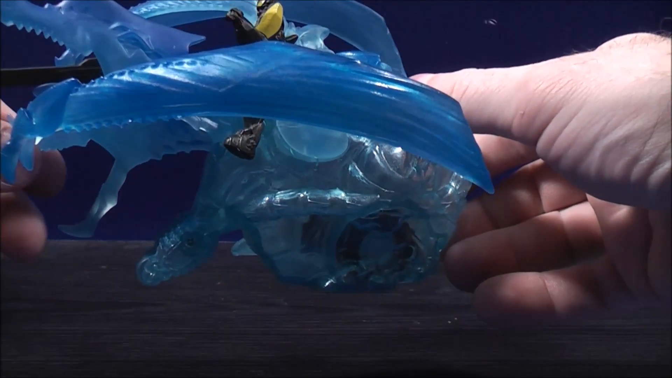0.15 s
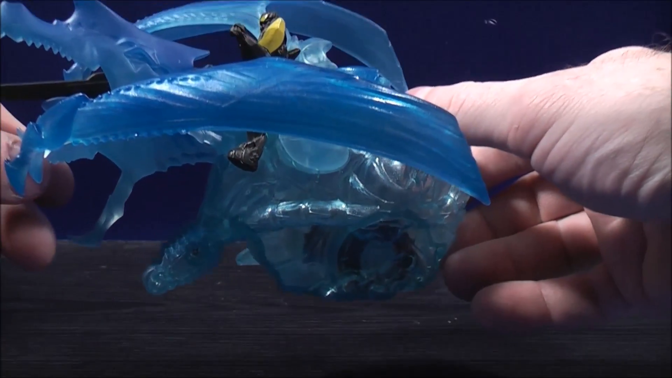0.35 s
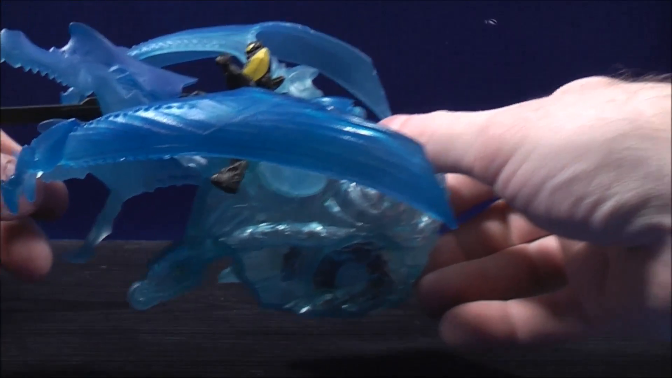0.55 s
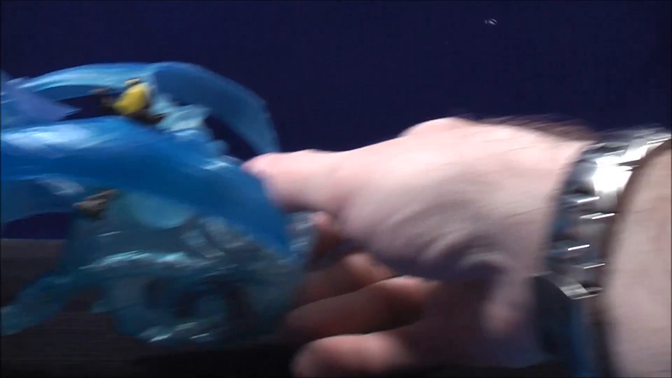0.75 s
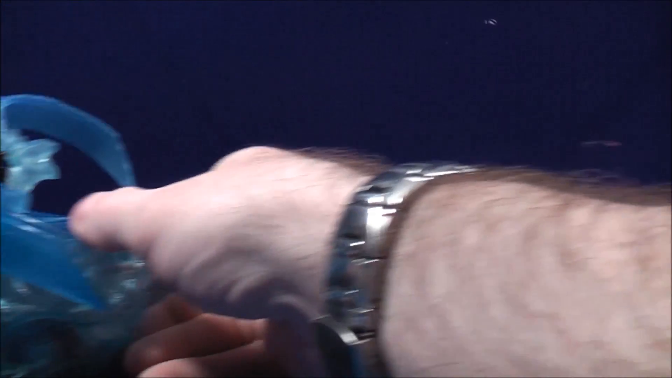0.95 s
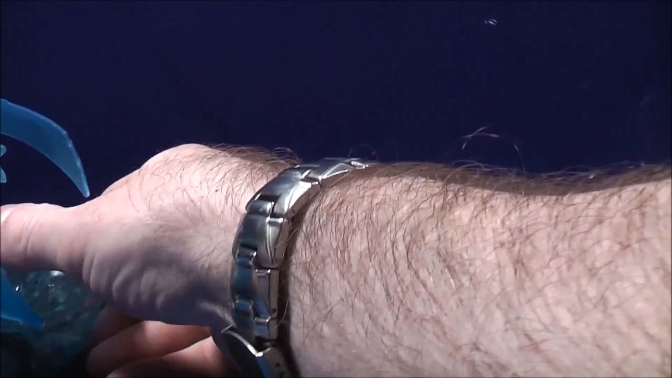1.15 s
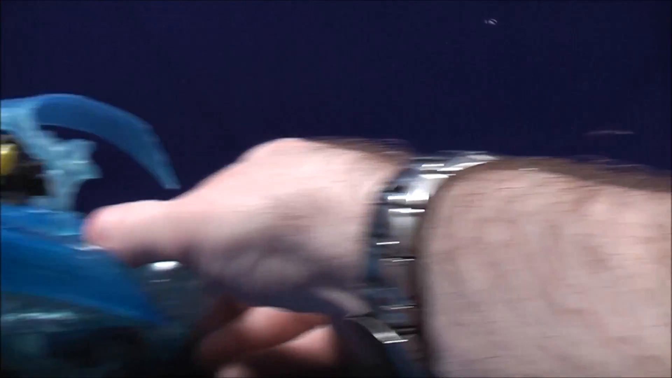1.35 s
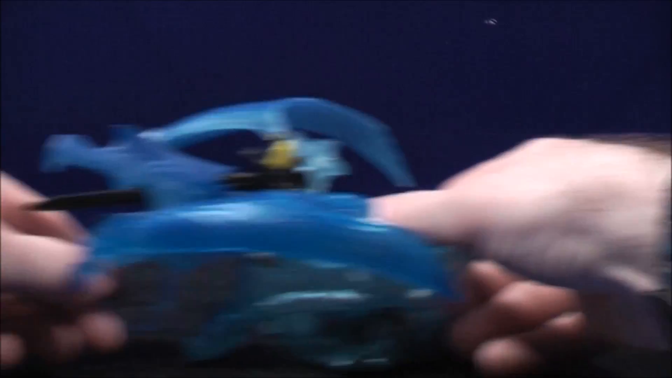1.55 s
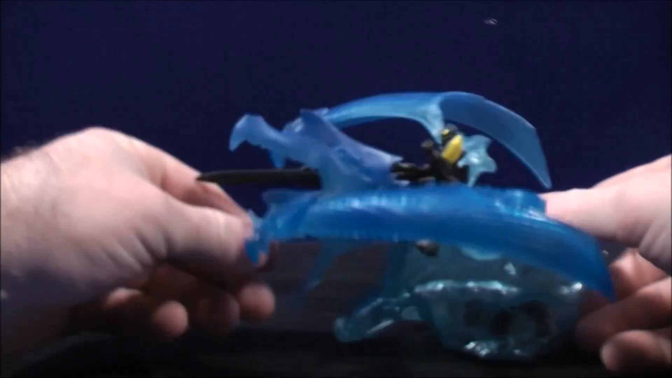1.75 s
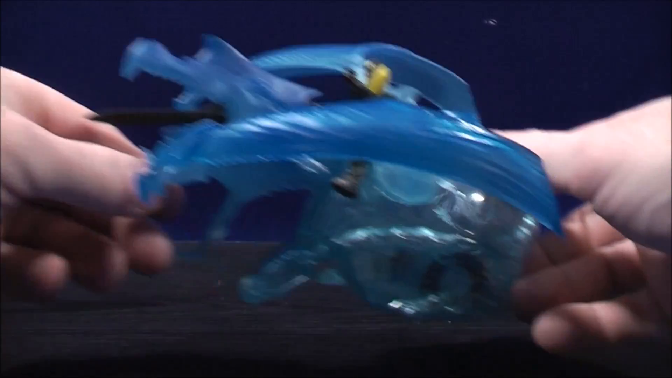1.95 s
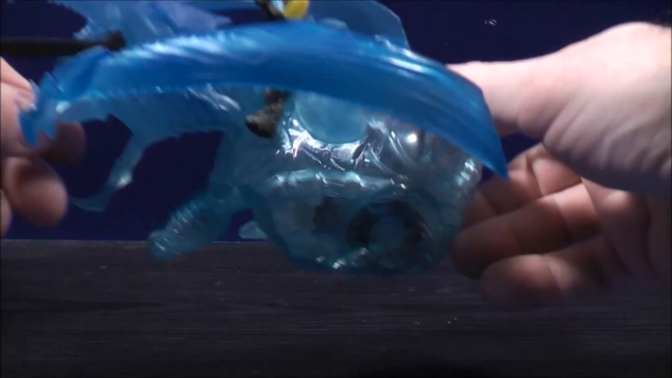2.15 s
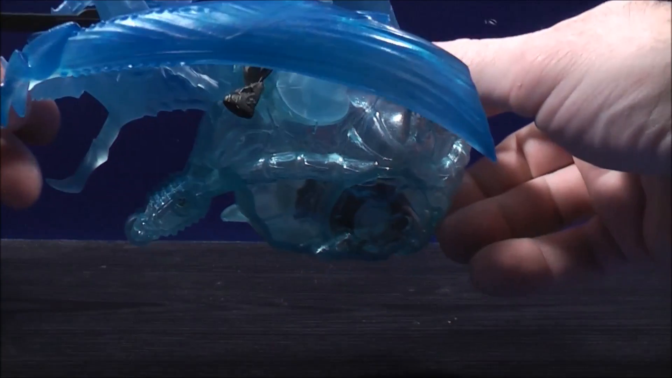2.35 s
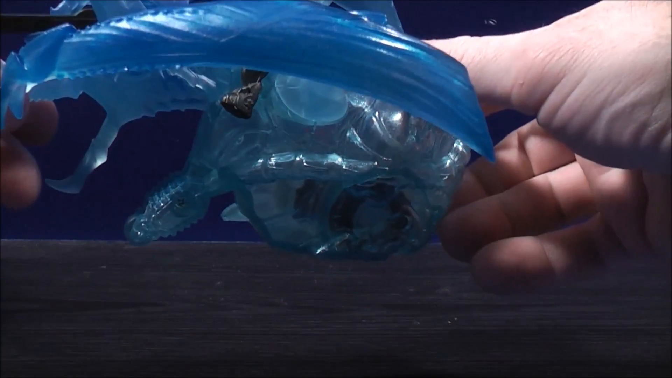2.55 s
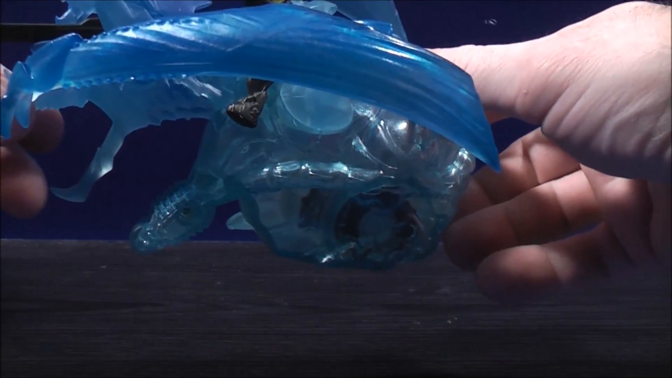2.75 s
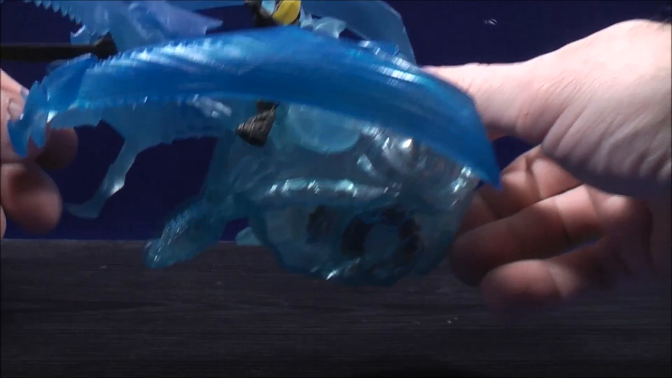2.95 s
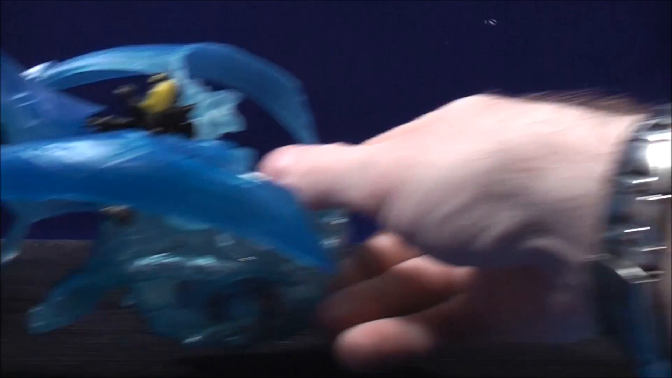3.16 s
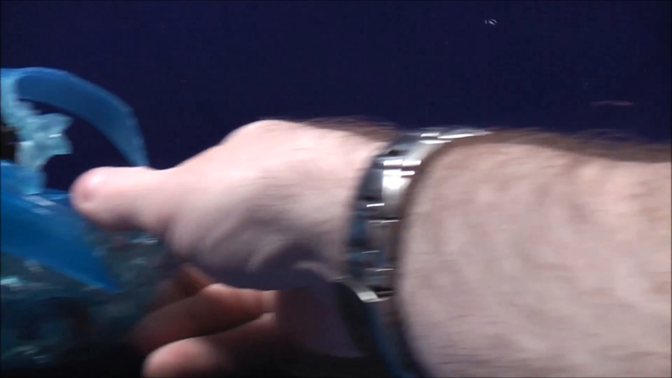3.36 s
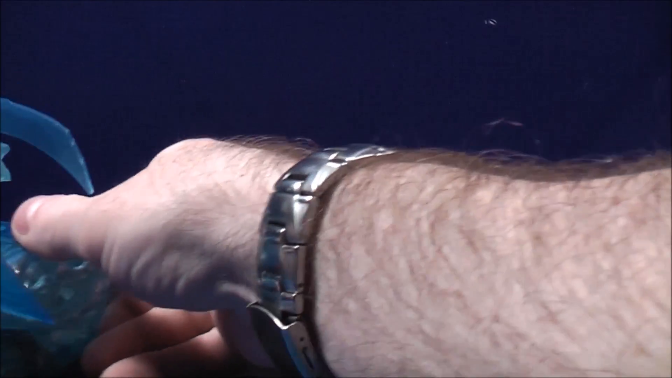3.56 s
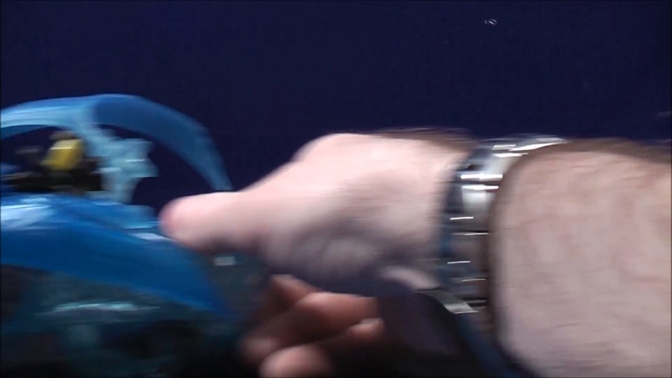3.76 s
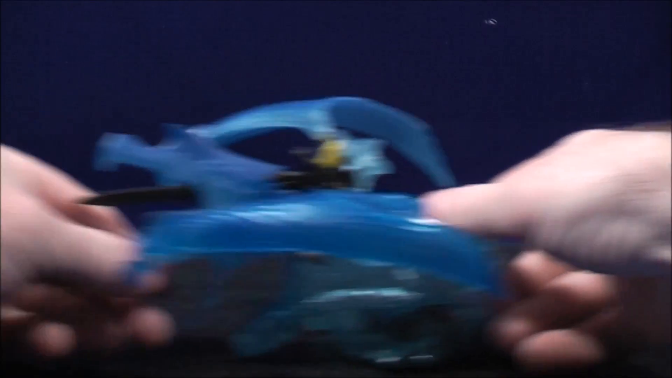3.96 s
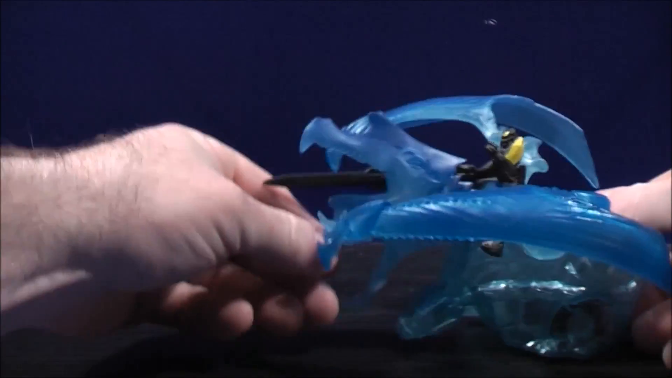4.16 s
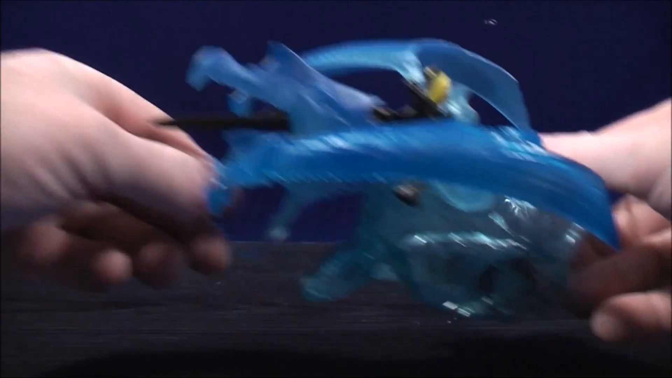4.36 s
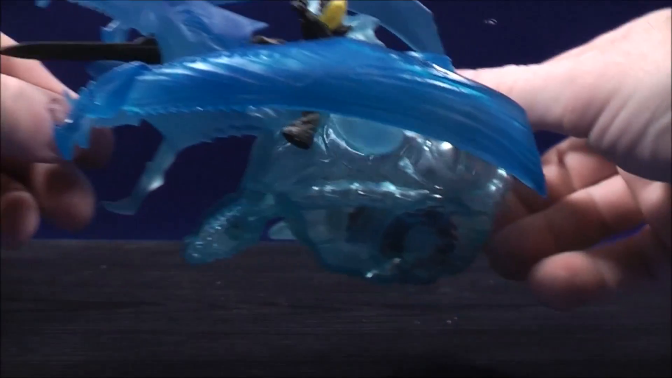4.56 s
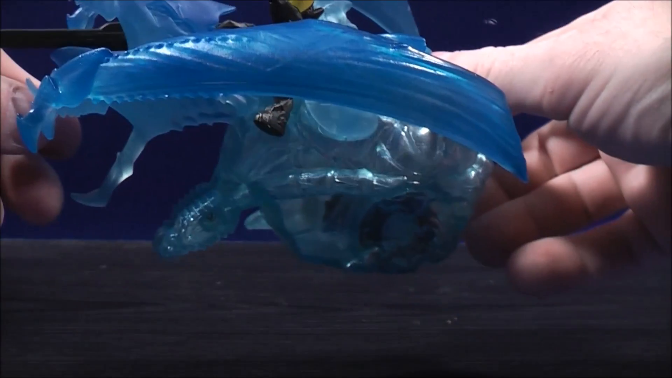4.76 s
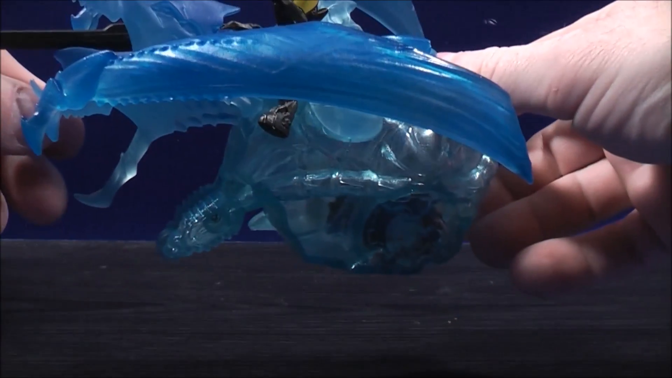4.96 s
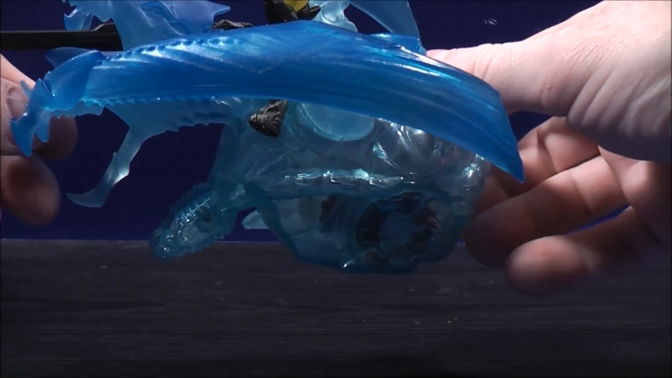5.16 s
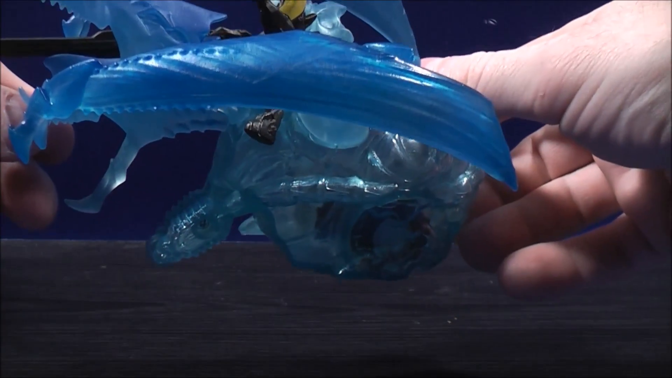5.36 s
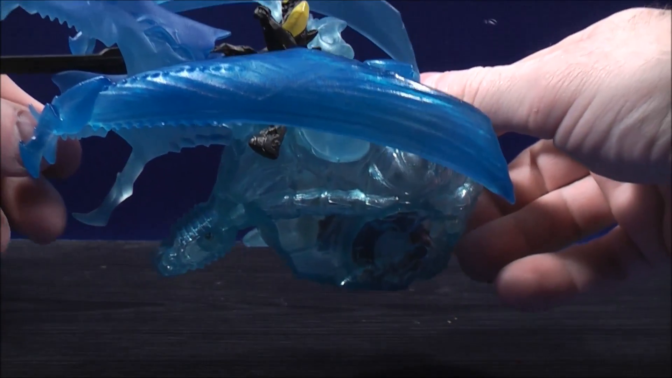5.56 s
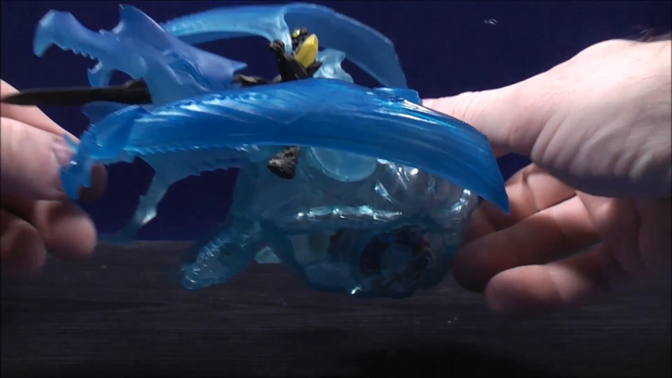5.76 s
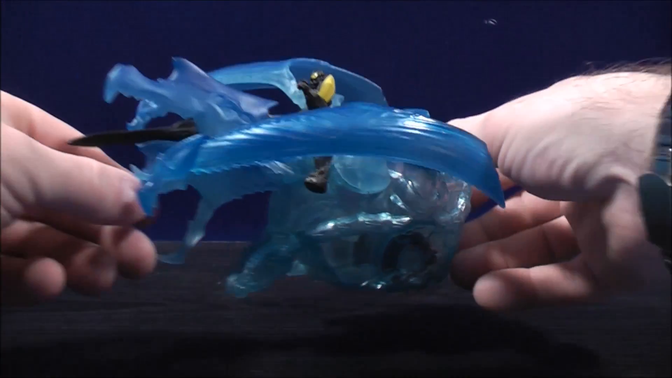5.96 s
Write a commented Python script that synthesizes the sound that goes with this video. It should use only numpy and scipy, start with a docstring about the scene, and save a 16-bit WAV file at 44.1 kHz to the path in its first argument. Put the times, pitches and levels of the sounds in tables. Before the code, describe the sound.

Close up in a quiet room, small gears spin down inside a plastic toy. After a short pause the toy taps onto a wooden table and is pulled back with a rising grind and low rumble. Released, the motor zips and whirs, loose gears clicking in the shell as they slow and stop. A second pull and release follows, sputtering out in a few last ticks.

```python
"""Pull-back toy on a wooden table

A plastic toy is set down, dragged so that its wheels wind the gears, and lifted, twice over. The gear
train whirs, rattles loosely in its shell and runs down, with a zip of meshing teeth at each lift;
the wheels rumble through the table top. The scene opens on a run already dying away.
A quiet room hums around a close stereo microphone."""
import sys
import numpy as np
from scipy import signal
from scipy.fft import rfft, irfft, next_fast_len
from scipy.io import wavfile
from scipy.ndimage import uniform_filter1d, map_coordinates

SR = 44100
rng = np.random.default_rng(int(sys.argv[2]) if len(sys.argv) > 2 else 0)


def put_to_file(sound):
    """Save the sound as 16-bit audio at rate SR, in the file named by the first command-line argument."""
    columns = np.atleast_2d(sound).T  # one column per channel
    safe = np.clip(columns, -1, 1)
    whole_steps = np.round(safe * 32767)
    wavfile.write(sys.argv[1], SR, whole_steps.astype(np.int16))


N = 264419
T = np.arange(N) / SR


def gears():
    """Tooth noise, a purr of ticks and loud clacks shake the shell; the tone follows load and speed."""
    # whirr level, one curve per run or drag: time_s, level_db
    whirr_curves = [
        [(0.0, -36.5), (0.292, -42.5), (0.572, -52), (0.66, -92.5)],
        [(1.24, -66.5), (1.31, -46.5), (1.484, -39), (1.65, -37), (1.76, -38.5), (1.83, -53)],
        [(1.831, -40.5), (1.9, -27), (1.96, -28), (2.055, -34), (2.727, -38), (3.02, -44.5), (3.1, -54),
         (3.15, -47), (3.289, -55.5), (3.325, -62), (3.37, -81)],
        [(3.612, -54), (3.66, -48), (3.838, -38), (4.18, -34), (4.26, -52)],
        [(4.261, -48), (4.298, -38.5), (4.308, -28.5), (4.519, -33.5), (5.07, -39), (5.1, -40.5), (5.2, -40.5),
         (5.42, -48.5), (5.46, -46), (5.51, -57.5), (5.55, -47.5), (5.58, -59), (5.605, -45.5), (5.66, -66),
         (5.72, -74)],
    ]
    # loudest clacks of the loose gears: start_s, body_db, treble_over_body_db
    clacks = [(0.0147, -4.5, 4.5), (0.0288, -8, 3), (0.0524, -11, 2), (0.066, -13, 9), (0.0821, -1, 1),
              (0.094, -11.5, 9.5), (0.107, -12, 5), (0.1253, -8.5, 8), (0.14, -8, 3), (0.154, -10, 4.5),
              (0.176, -12, -2), (0.19, -5.5, 0), (0.2063, -10, 0), (0.2211, -7, 4.5), (0.238, -9, 4),
              (0.2575, -2.5, -0.5), (0.281, -15, 11.5), (0.3064, -9, -5), (0.3257, -6.5, 1),
              (0.3392, -5, 3), (0.4066, -12, 3), (0.4239, -11.5, 4), (0.486, -16, 1.5), (0.5491, -17, -16),
              (1.3268, -10, -4), (1.3483, -7.5, 1.5), (1.377, -8, -13), (1.4131, -10, 0),
              (1.4324, -5.5, 4.5), (1.5032, -14, 4), (1.542, -16.5, 12.5), (1.641, -7.5, 4.5),
              (1.691, -21, 14), (1.9006, 1.5, -4), (1.9457, -2, 1.5), (1.98, -1.5, -0.5), (1.992, 3, -7),
              (2.0211, -0.5, -0.5), (2.0436, 0, -6), (2.0583, -0.5, -1.5), (2.0697, 0.5, -2),
              (2.0955, -1, -4), (2.1314, -1.5, -1.5), (2.1607, -2.5, -3), (2.1816, -1.5, -2.5),
              (2.205, -2, -1), (2.2205, -1.5, -0.5), (2.24, -6, 1), (2.2665, -11, 6), (2.2921, -8, 1),
              (2.309, -3.5, 1), (2.3609, -7.5, 6.5), (2.394, -5, 2.5), (2.4258, -8.5, 7.5),
              (2.442, -5.5, 2), (2.4598, -8, 4), (2.4829, -9, 6), (2.4954, -2, -6), (2.5076, -0.5, 0),
              (2.5276, -5, -0.5), (2.5557, -8.5, 4), (2.5864, -9.5, 5), (2.6062, -5, 1.5),
              (2.6215, -6.5, 4), (2.6377, -6, 3), (2.6639, -3.5, 3), (2.7044, -8, 5), (2.7574, -15.5, 11.5),
              (2.7776, -14, 8), (2.7968, -11.5, 9.5), (2.841, -7, 2.5), (2.8551, -3.5, 1),
              (2.8748, -11.5, 8.5), (2.9049, -2, 0.5), (2.9488, -15.5, 7), (2.9726, -10, -1.5),
              (3.0328, -12, -1), (3.05, -9, 4), (3.0754, -15, 7.5), (3.1171, -14.5, 3), (3.202, -17.5, 5),
              (3.287, -18, -20), (3.3216, -26, -18.5), (3.6468, -14.5, -1), (3.661, -14, 0.5),
              (3.6996, -19, 3), (3.7199, -14.5, 5), (3.746, -20, 6), (3.7771, -7, 2), (3.799, -8, 6),
              (3.862, -12, 6.5), (3.9199, -1.5, 3.5), (3.94, -7, 6.5), (3.959, -3, 3), (3.992, -2, 4),
              (4.007, -7, 9), (4.0307, 0, 2.5), (4.051, -5.5, 5), (4.0874, -2.5, 3), (4.1035, -17, 19),
              (4.14, -20.5, 19), (4.1717, -12, 12), (4.2035, -17.5, 12.5), (4.303, -2, 5.5),
              (4.333, -4.5, 8), (4.3615, -0.5, 1), (4.3846, -1.5, 1), (4.3989, 4.5, -3.5), (4.426, 2.5, -4),
              (4.4462, -3, -1), (4.487, 5, -10.5), (4.4972, -2, -5), (4.5194, 0.5, -7), (4.5263, -5, 1.5),
              (4.5466, -2, -5), (4.5558, -3, -6), (4.5606, 1, -11), (4.57, -6, 1), (4.5969, -2.5, -4.5),
              (4.6078, -1.5, -3.5), (4.623, -4.5, -1), (4.678, -7.5, 3), (4.694, -3.5, 0.5),
              (4.7168, -6, 2.5), (4.752, -4, -2), (4.7596, -6, 3), (4.7877, -4.5, 2), (4.805, -6.5, 3.5),
              (4.851, -12.5, 7.5), (4.932, -5, 1.5), (4.9609, -5, 4.5), (5.0018, -8, 3), (5.032, -4.5, 3.5),
              (5.0467, -6, 0), (5.0522, 0.5, 1.5), (5.0723, -7, 4.5), (5.1152, -4, 4), (5.159, -9.5, 4.5),
              (5.171, -12, 2), (5.185, -8.5, -2), (5.195, -14, 5), (5.2467, -11, 2.5), (5.263, -1.5, 1),
              (5.2781, -4, 3.5), (5.298, -10, 3.5), (5.334, -4, -2.5), (5.435, -6, 0), (5.4578, -17, 8),
              (5.535, -16.5, 5), (5.585, -13.5, 2.5), (5.5988, -16, 7.5)]
    # wheels pressed on the table: start_s, lift_s
    drags = [(1.4, 1.83), (3.77, 4.25)]
    # mode of the wall that the clacks strike: pitch_hz, width_hz, gain_db
    struck_wall = [(2520, 1100, 3)]
    (whirr_db,), gate = curves(whirr_curves)
    speed_db = whirr_db + 38  # 0 at a middle speed
    pressed = uniform_filter1d(sum(((T > start) & (T < lift)) * 1.0 for start, lift in drags), size=1200)
    racing = (1 - pressed) * sum((T > lift) * np.clip(2 - (T - lift) / 0.26, 0, 1) for _, lift in drags)
    loose = np.clip(0.33 - 0.28 * pressed - 0.26 * racing, 0, 1)  # loaded gears have no play to tick
    dulled = sum((T > lift) * np.exp(-np.abs(T - lift) / 0.089) for _, lift in drags)
    bright_db = 0.5 - 0.24 * speed_db - 5.5 * dulled
    fizz_db = -7.5 + 0.05 * speed_db - pressed - 14.5 * dulled
    # faster gears part sooner; loaded gears grind rather than snap
    contact = amp(-0.6 * np.clip(speed_db, -4, 10)) * (1 + 1.3 * pressed)

    clack_s, body_db, treble_db = np.transpose(clacks)
    purr = gear_purr(speed_db, contact, clack_s)
    teeth = amp(1.5 * wobble(40) + 0.8 * wobble(9)) * rng.standard_normal(N)
    whirr = gate * amp(whirr_db) * (np.sqrt(1 - loose) * teeth + np.sqrt(loose) * purr)

    t60_s = 0.008 * np.interp(clack_s, T, contact)
    free = 1 - np.interp(clack_s, T, pressed)
    clack_body = blows(clack_s, amp(body_db), t60_s, snap=3 * free, buzz_db=-13.5)
    clack_treble = blows(clack_s, amp(body_db + treble_db), t60_s, snap=free, buzz_db=-5.5)
    body = filtered(clack_body, modes(struck_wall)) + whirr
    treble = clack_treble + amp(bright_db) * whirr
    fizz = amp(fizz_db) * (whirr + amp(2.5 - bright_db) * clack_treble)
    return shell(np.array([body, treble, fizz]), teeth, pressed, racing)


def gear_purr(speed_db, contact, clack_s):
    """A wobbling gear ticks against the shell once a turn, except on turns that carry a clack."""
    max_ticks, top_turns_per_s, jitter_turns, spread_db = 470, 76, 0.2, 4
    timing, strength = rng.random((max_ticks, 2)).T
    turns = np.cumsum(top_turns_per_s * amp(0.2 * np.minimum(speed_db, 0))) / SR
    # bend the rotation so that each clack falls on a whole turn
    anchors = np.r_[0, np.interp(clack_s, T, turns), turns[-1]]
    whole_turns = np.r_[0, np.cumsum(np.maximum(np.round(np.diff(anchors)), 1))]
    turns = np.interp(turns, anchors, whole_turns)
    count = np.arange(max_ticks)
    tick_s = np.interp(count + jitter_turns * (timing - 0.5), turns, T)
    size = amp(spread_db * strength) * (count < whole_turns[-1]) * ~np.isin(count, whole_turns)
    ticks = blows(tick_s, size, 0.006 * np.interp(tick_s, T, contact), snap=1, buzz_db=-9.5)
    return unit(filtered(ticks, lambda hz: 1 / (1 + 1j * hz / 7000)))  # soft contact


def blows(start_s, size, t60_s, snap, buzz_db, buzz_t60_s=0.09):
    """Short impacts: a sharp first contact, a dying chatter and a faint longer buzz."""
    t = np.arange(2400) / SR
    decay = amp(-60 * t / t60_s[:, None]) + amp(buzz_db - 60 * t / buzz_t60_s)
    chatter = rng.standard_normal((len(start_s), len(t))) * decay
    chatter *= 1 - np.exp(-t / 0.00024)
    chatter[:, 0] = snap * np.sign(chatter[:, 1])
    chatter /= np.linalg.norm(chatter, axis=1)[:, None]
    samples = np.round(start_s * SR).astype(int)[:, None] + np.arange(len(t))
    return np.bincount(samples.ravel(), (chatter * size[:, None]).ravel(), N + SR)[:N]


def shell(drive, teeth, pressed, racing):
    """The plastic shell rings in three crossfaded colours: coasting, pressed down and racing."""
    # shell colour in the air, on the table and driven hard: frequency_hz, gain_db
    coasting_eq = [(300, -11.5), (494, -19), (656, -6.5), (856, -9.5), (1100, -9.5), (1410, 1),
                   (1930, -4.5), (2480, -0.5), (3130, -7.5), (6960, -14), (7950, -9.5), (9550, -20),
                   (16000, -40.5)]
    pressed_eq = [(590, -53), (1000, -27), (1200, -1.5), (1670, 9), (2410, 0), (2620, 5.5), (3580, 3),
                  (5760, -4.5), (7790, -5.5), (9600, -8), (16000, -41)]
    racing_eq = [(400, -53), (655, -7), (893, -15.5), (1180, -15), (1270, -6), (2470, -3.5), (3580, -7.5),
                 (9470, -12), (12900, -22.5), (16000, -40.5)]
    # shell modes that stand out in each state: pitch_hz, width_hz, boost_db
    coasting_rings = [(1685, 88, 7), (2434, 500, 5.5), (3540, 1300, 7), (4500, 1400, 6), (6440, 930, 11),
                      (7150, 500, 10.5), (9430, 1100, 9)]
    pressed_ring = (5600, 340, 3.5)
    racing_rings = [(2600, 260, 1.5), (5820, 346, 3.5), (7270, 2100, 7), (9030, 560, 2)]
    # body, treble and fizz bands: low_hz, high_hz
    bands = [(200, 5000), (5000, 10500), (10500, 20000)]
    out = 0
    for share, eq, rings in ((1 - pressed - racing, coasting_eq, coasting_rings),
                             (pressed, pressed_eq, [pressed_ring]),
                             (racing, racing_eq, racing_rings)):
        faded = np.sqrt(np.abs(share)) * drive
        *layers, steady = filtered(np.vstack([faded, teeth]), colour(eq, rings))
        for layer, band in zip(layers, bands):
            bandpass = signal.butter(3, band, "band", fs=SR, output="sos")
            band_rms = np.std(signal.sosfilt(bandpass, steady))  # steady tooth noise levels the bands
            out = out + signal.sosfilt(bandpass, layer) / band_rms
    return out


def gear_mesh():
    """Teeth strike at a rate that climbs, then sags: a rough zip through the shell and a faint whine."""
    # the wound train lets go: start_s, level_db
    releases = [(1.843, -28.5), (4.266, -34)]
    # what the shell lets out of the zip: frequency_hz, gain_db
    zip_eq = [(400, -10), (650, 0), (1000, -13), (1400, -3), (2400, -1), (3800, -6), (6000, -20)]
    # overtones that stay on as the train slows: tooth_rate_multiple, level_db
    overtones = [(2.5, -11), (3, -8), (4, -12)]
    aim_hz, spinup_s, coast_s = 3700, 0.12, 0.8
    zip_rise_s, zip_end_s, whine_from_s, whine_end_s = 0.022, 0.3, 0.12, 0.6
    zips = whines = 0
    for start_s, db in releases:
        age = np.maximum(T - start_s, 0)
        tooth_hz = aim_hz * (1 - np.exp(-age / spinup_s)) * np.exp(-age / coast_s)
        phase = 2 * np.pi * np.cumsum(tooth_hz * (1 + 0.012 * wobble(250))) / SR
        tone = np.sin(phase) + 0.7 * np.sin(2 * phase) + 0.3 * np.sin(3 * phase)
        swell = np.clip(age / zip_rise_s, 0, 1) ** 2 * np.sqrt(np.clip(1 - age / zip_end_s, 0, 1))
        zips = zips + swell * amp(db + 1.5 * wobble(70)) * tone
        phase = 2 * np.pi * np.cumsum(tooth_hz * (1 + 0.005 * wobble(200))) / SR
        whine = sum(amp(db + level + 3 * wobble(40)) * np.sin(k * phase) for k, level in overtones)
        linger = np.clip(age / whine_from_s - 1, 0, 1) * np.clip(1 - age / whine_end_s, 0, 1)
        whines = whines + linger * whine
    return filtered(zips, colour(zip_eq)) + whines


def wheels():
    """Uneven tread bumps and rolling noise drive the table top."""
    # rumble, one curve per drag: time_s, level_db, upper_over_low_db
    roll_curves = [
        [(1.24, -41, -4), (1.342, -66, -11), (1.39, -35.5, -3), (1.544, -37, 1), (1.696, -25, -12),
         (1.9, -53, -2), (2.03, -65.5, 17.5), (2.17, -53, 11), (2.3, -82, 10)],
        [(3.615, -29.5, -5), (3.631, -49, -21), (3.749, -53, 2.5), (4.019, -49.5, 2.5), (4.063, -24.5, -6),
         (4.181, -35, -17), (4.347, -82.5, 28.5), (4.657, -49.5, 5), (4.8, -88, 22)],
    ]
    # low and upper modes of the table top: pitch_hz, width_hz, gain_db
    low_modes = [(150, 30, -4), (194, 20, -1), (261, 22, -1), (300, 20, -1), (335, 22, 0), (395, 24, 1)]
    upper_modes = [(489, 62, 0.5), (620, 130, -1), (703.3, 15, 4.5), (874, 56, -0.5)]
    bumps_per_s = 66
    (db, upper_db), gate = curves(roll_curves)
    tread = np.cumsum(bumps_per_s * (1 + 0.041 * wobble(30))) / SR
    bumps = np.diff(np.floor(tread), prepend=0) * amp(4.4 * wobble(60))
    drive = unit(bumps) + 1.52 * amp(1.87 * wobble(60)) * rng.standard_normal(N)
    low = unit(filtered(drive, modes(low_modes)))
    upper = unit(filtered(drive, modes(upper_modes)))
    return gate * amp(db) * (low + amp(upper_db) * upper)


def knocks():
    """Setting the toy down rings toy and table together, with a dull burst of contact noise."""
    # touchdowns: start_s, gain_db, low_thud_db
    touchdowns = [(1.229, -0.5, -6), (1.23, -15, 31.5), (3.61, -14.5, 0)]
    # modes of toy and table: pitch_hz, level_db, t60_s
    knock_modes = [(188, -25.5, 0.042), (370, -29, 0.017), (764, 1, 0.012), (860, -4, 0.035),
                   (1445, 0, 0.02), (2130, 13.5, 0.0018)]
    out, t = np.zeros(N + SR), np.arange(SR // 4) / SR
    for start_s, db, thud_db in touchdowns:
        knock = 0.3 * amp(-60 * t / 0.15) * uniform_filter1d(rng.standard_normal(len(t)), size=9)
        for hz, level_db, t60_s in knock_modes:
            mode_db = level_db + thud_db * (hz < 500) + 1.5 * rng.normal()
            knock += amp(mode_db - 60 * t / t60_s) * np.sin(2 * np.pi * hz * t)
        attack = 1 - np.exp(-t / 0.00048)
        out[round(start_s * SR):][:len(t)] += amp(db - 15.5) * knock * attack
    return out[:N]


def joint_ticks(t60_s=0.011):
    """Plastic joints tick: short, slightly noisy pings of three inharmonic partials."""
    # ticks of the joints: start_s, gain_db, pitch_hz
    ticks = [(0.633, -36, 4520), (0.684, -38, 3830), (1.199, -27, 4700), (5.7692, -32, 5670)]
    out, t = np.zeros(N + SR), np.arange(SR // 4) / SR
    for start_s, db, hz in ticks:
        phase = 2 * np.pi * hz * t
        ping = np.sin(phase) + 0.33 * np.sin(1.44 * phase) + 0.62 * np.sin(0.74 * phase)
        ping += 0.14 * rng.standard_normal(len(t))
        out[round(start_s * SR):][:len(t)] += amp(db - 8.5 - 60 * t / t60_s) * ping
    return out[:N]


def room_echo(source):
    """A short room tail of decaying noise, a different one at each capsule."""
    # room decay: frequency_hz, t60_s, level_db
    decay = [(100, 0.45, 20), (412, 0.15, 21.5), (2020, 0.064, 11.5), (5340, 0.025, 14), (8900, 0.068, 16),
             (11800, 0.044, -77)]
    hz, t, spectra = signal.stft(rng.standard_normal((2, SR // 3)), SR, nperseg=256)
    alike = 1 / (1 + (hz[:, None] / 500) ** 2)  # long waves reach both capsules alike
    spectra[1] = alike * spectra[0] + np.sqrt(1 - alike ** 2) * spectra[1]
    band_hz, band_t60_s, band_db = np.transpose(decay)
    t60_s = along(np.c_[band_hz, band_t60_s], hz)[:, None]
    db = along(np.c_[band_hz, band_db], hz)[:, None]
    tail = signal.istft(spectra * amp(db - 60 * t / t60_s) / np.sqrt(t60_s), SR, nperseg=256)[1]
    delayed = np.pad(source, (150, 0))[None]
    return signal.fftconvolve(delayed, tail / np.linalg.norm(tail[0]), axes=1)[:, :N]


def room_tone():
    """Low background rumble, hiss and hum."""
    # swells with the table's rumble during drags, dips while the gears run loud: time_s, level_db
    level_curve = [(0.0, -51.5), (1.25, -49), (1.62, -31.5), (1.89, -51), (2.3, -56), (3.71, -50),
                   (3.99, -43), (4.66, -57.5), (6.0, -52)]
    # noise colour and its top roll-off: frequency_hz, level_db
    noise_eq = [(25, -43), (44, -23.5), (85, -17), (115, -16.5), (154, -9.5), (300, -7.5), (391, -11),
                (498, -21), (849, -20.5), (1200, -26), (1840, -31.5), (2540, -36.5), (3690, -36.5),
                (14800, -43.5)]
    roll_off = [(15600, -75)]
    # fuzzy hum tones: pitch_hz, width_hz, level_over_noise_db
    hum_tones = [(124.9, 6.5, -8), (2510, 180, -20.5)]
    # stereo image: frequency_hz, left_right_correlation
    likeness = [(60, 0.088), (180, 0.63), (550, 0.81), (1650, 0.68), (4970, 0.86), (15000, 0.99)]

    def mid_side(hz):
        angle = np.arccos(np.clip(along(likeness, hz), -1, 1)) / 2
        return amp(along(noise_eq + roll_off, hz)) * [np.cos(angle), np.sin(angle)]

    mid, side = filtered(rng.standard_normal((2, N)), mid_side)
    hum = sum(amp(level_db) * unit(filtered(rng.standard_normal(N), modes([(hz, width, 0)])))
              for hz, width, level_db in hum_tones)
    (db,), _ = curves([level_curve])
    return amp(db + 0.8 * wobble(9)) * (unit(np.array([mid + side, mid - side])) + hum)


def amp(db):
    """Decibels to gain."""
    return 10 ** (np.asarray(db) / 20)


def unit(x):
    """Scaled to rms 1."""
    return x / np.sqrt(np.mean(x ** 2) + 1e-20)


def along(points, hz):
    """Interpolate (frequency_hz, value) points on a log frequency axis."""
    point_hz, values = np.transpose(points)
    return np.interp(np.log(hz + 1), np.log(point_hz + 1), values)


def curves(tables):
    """Columns of joined tables per sample, and a soft gate that is open inside the tables."""
    time_s, *columns = np.transpose(np.vstack(tables))
    gate = sum(((T > rows[0][0]) & (T < rows[-1][0])) * 1.0 for rows in tables)
    return [np.interp(T, time_s, column) for column in columns], uniform_filter1d(gate, size=400)


def wobble(rate):
    """A smooth random curve, rate knots a second."""
    return map_coordinates(rng.standard_normal(int(N * rate / SR) + 4), [T * rate])


def filtered(x, response):
    """x through a frequency response."""
    size = next_fast_len(N + SR // 2)
    return irfft(rfft(x, size) * response(np.fft.rfftfreq(size, 1 / SR)), size)[..., :N]


def colour(eq, rings=()):
    """Minimum-phase response of an EQ curve plus resonant peaks: it rings only after a blow."""
    def response(hz):
        peaks_db = sum(db / (1 + (2 * (hz - centre) / width) ** 2) for centre, width, db in rings)
        cepstrum = irfft(np.log(np.maximum(amp(along(eq, hz) + peaks_db), 1e-4)))
        half = len(cepstrum) // 2
        cepstrum[1:half] *= 2
        cepstrum[half + 1:] = 0
        return np.exp(rfft(cepstrum))
    return response


def modes(table):
    """Response of resonances (pitch_hz, width_hz, gain_db) summed in alternating polarity."""
    return lambda hz: sum((-1) ** k * amp(db) * 1j * hz * width / (pitch**2 - hz**2 + 1j * hz * width)
                          for k, (pitch, width, db) in enumerate(table))


def scene():
    """The toy, close and centred, in its room; small things radiate no deep bass."""
    toy = gears() + gear_mesh() + wheels() + knocks() + joint_ticks()
    toy = signal.sosfilt(signal.butter(3, 110, "high", fs=SR, output="sos"), toy)
    return toy + amp(-13.5) * room_echo(toy) + room_tone()


def record(dry):
    """A brick-wall low-pass at 16.5 kHz."""
    return filtered(dry, lambda hz: hz < 16500)


dry = scene()
out = record(dry)
put_to_file(out)
```